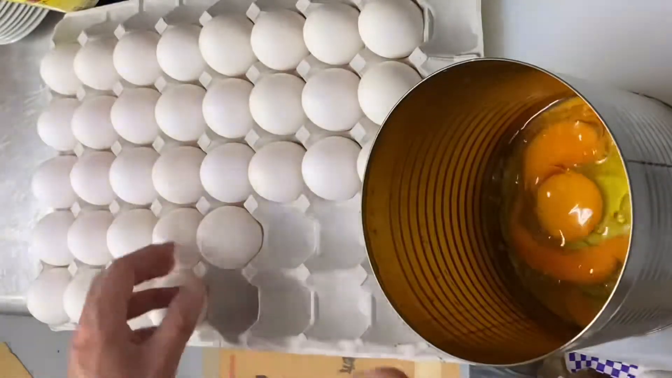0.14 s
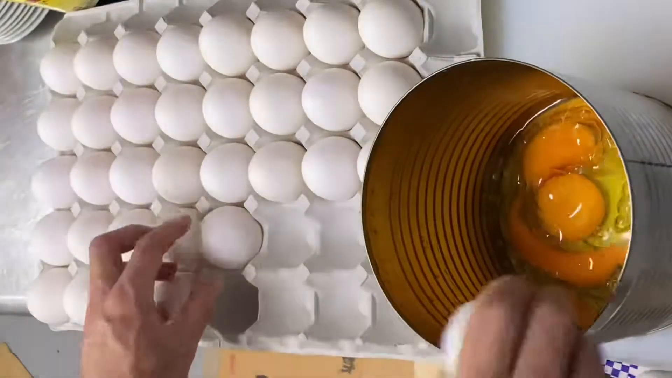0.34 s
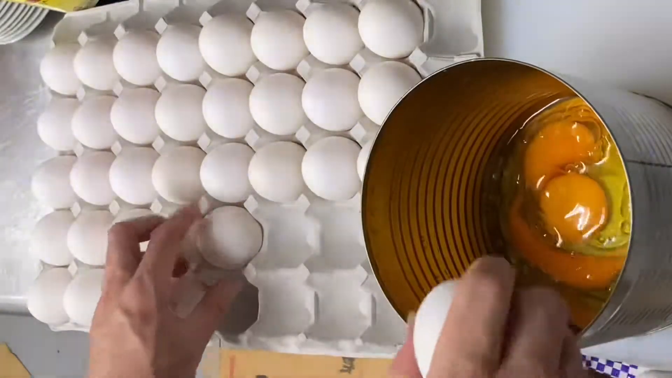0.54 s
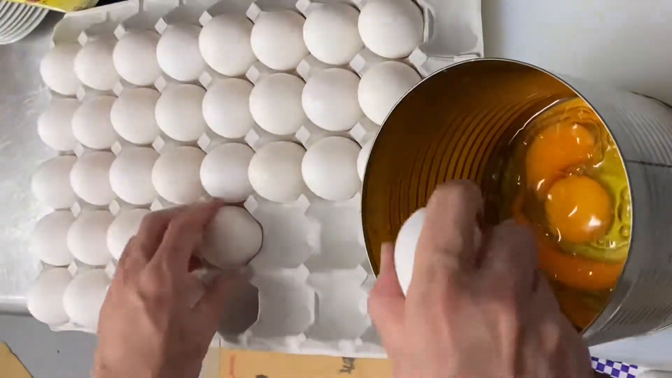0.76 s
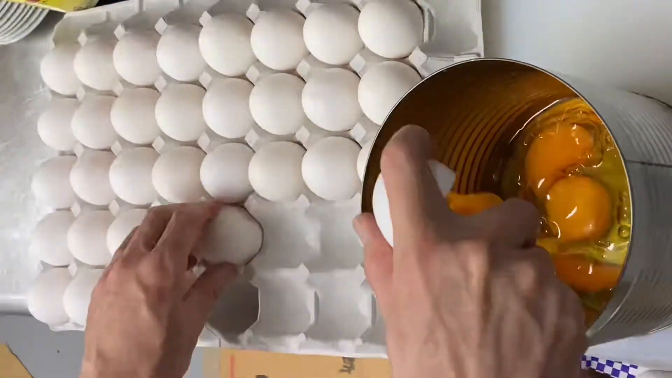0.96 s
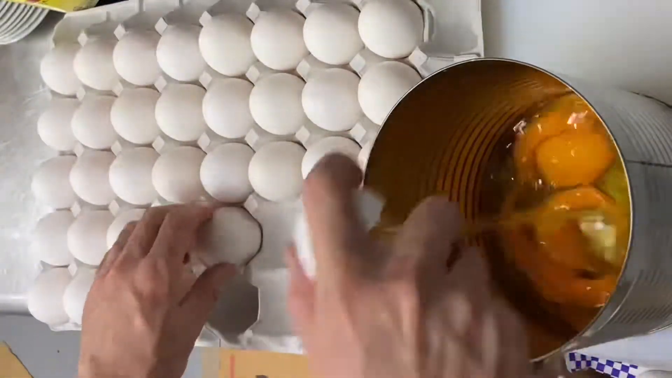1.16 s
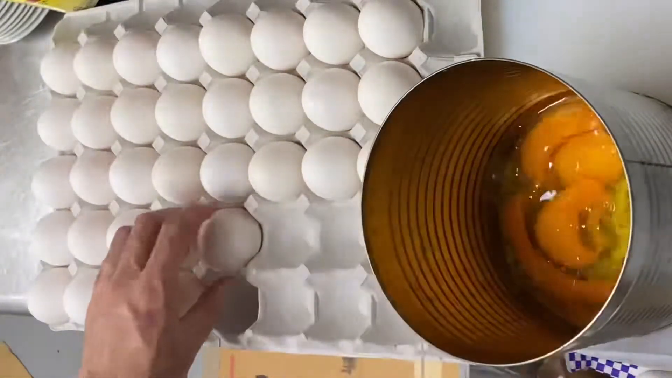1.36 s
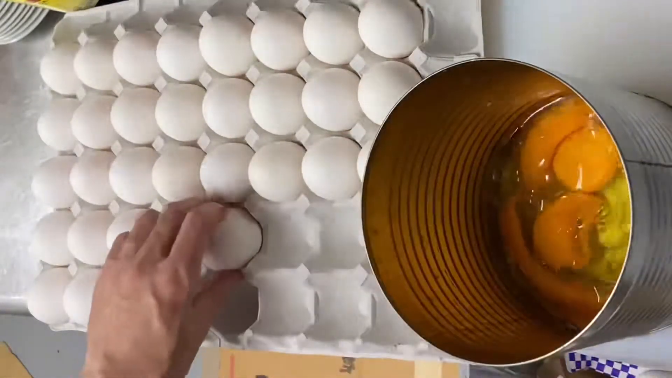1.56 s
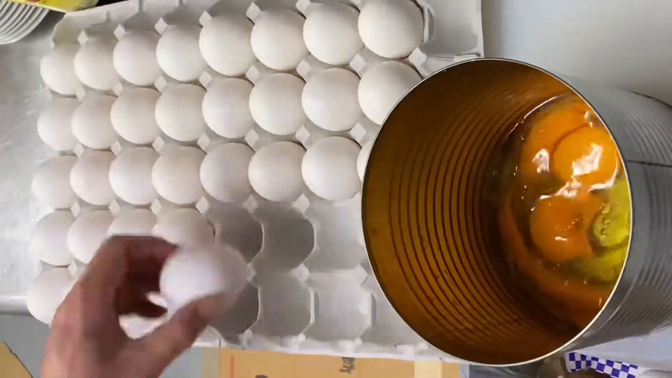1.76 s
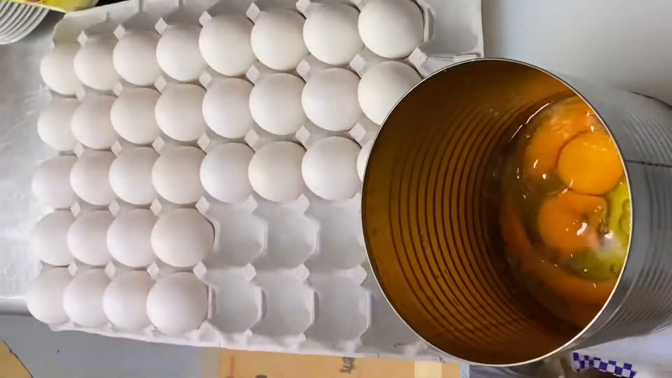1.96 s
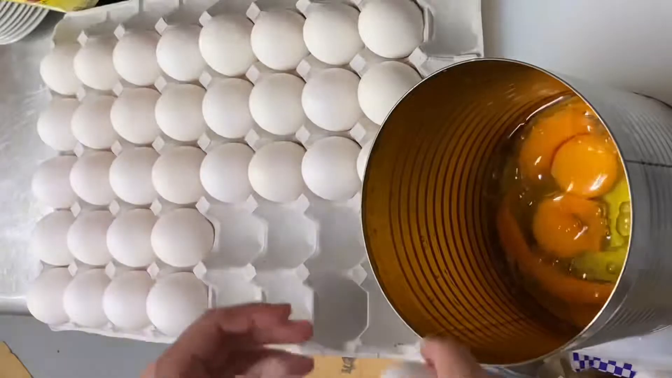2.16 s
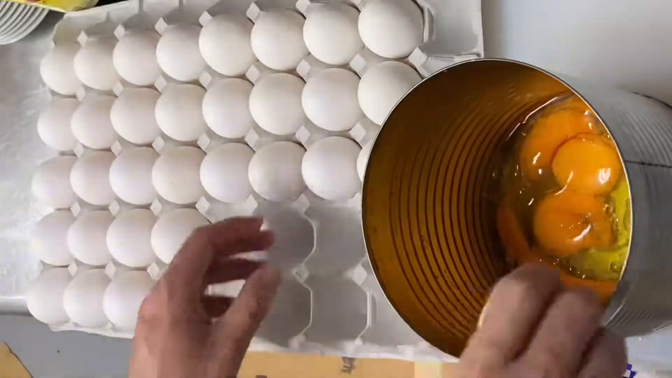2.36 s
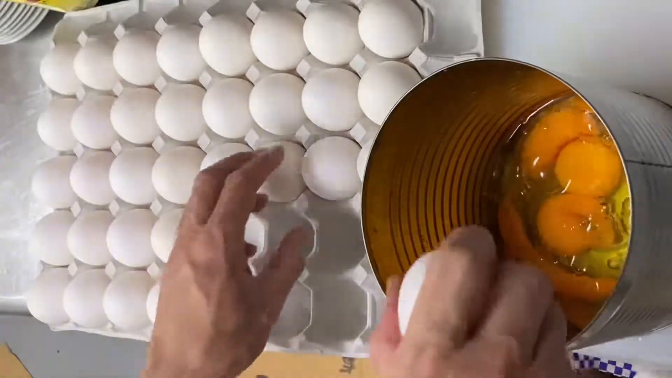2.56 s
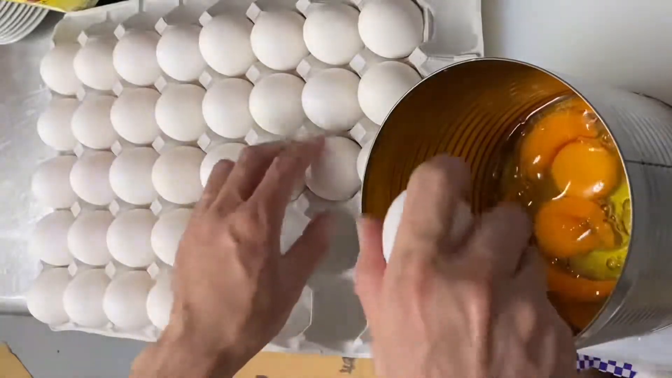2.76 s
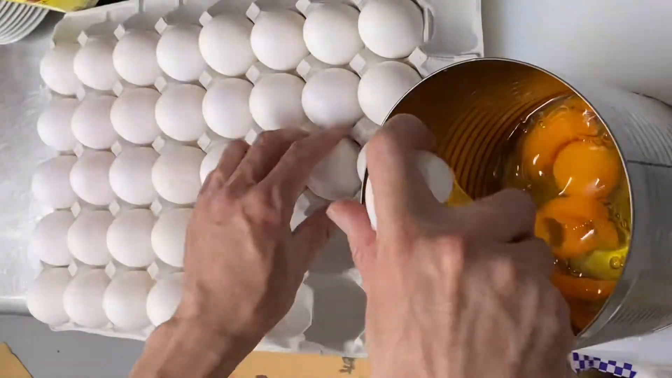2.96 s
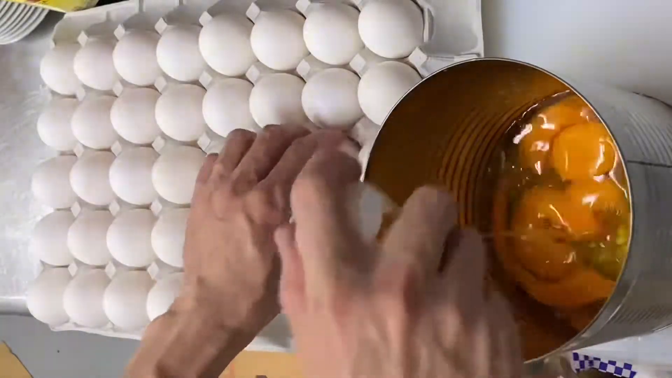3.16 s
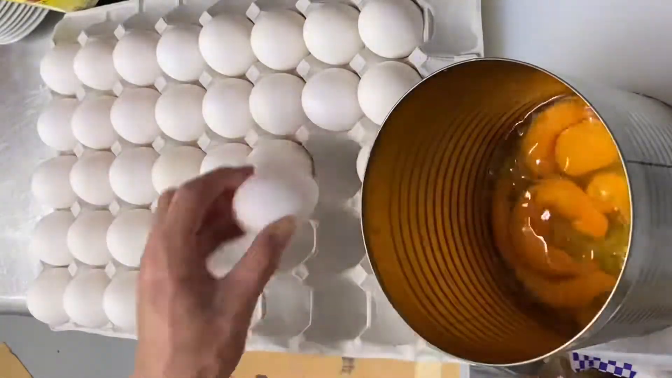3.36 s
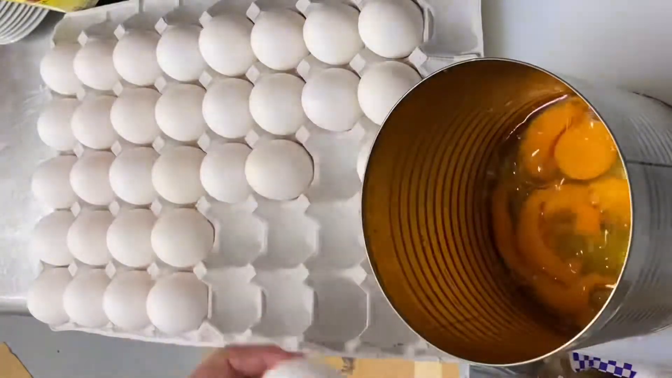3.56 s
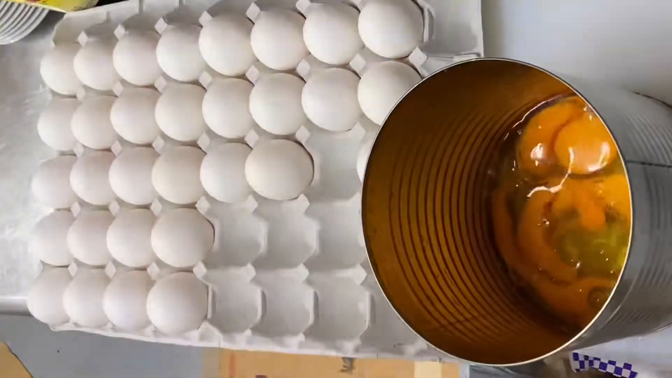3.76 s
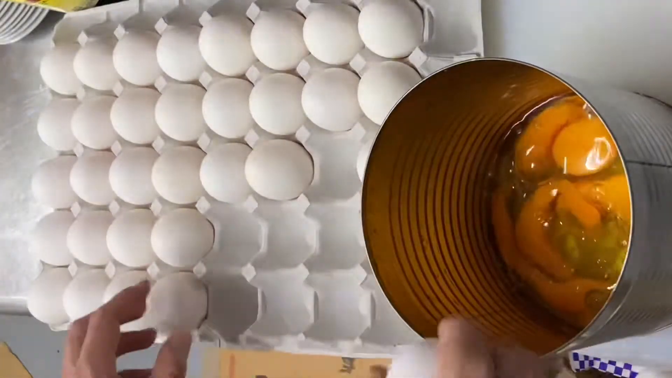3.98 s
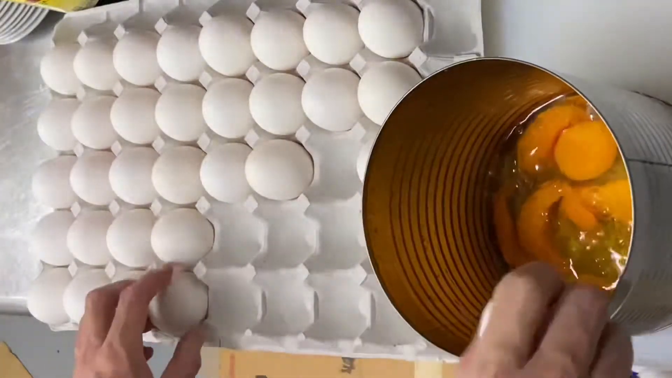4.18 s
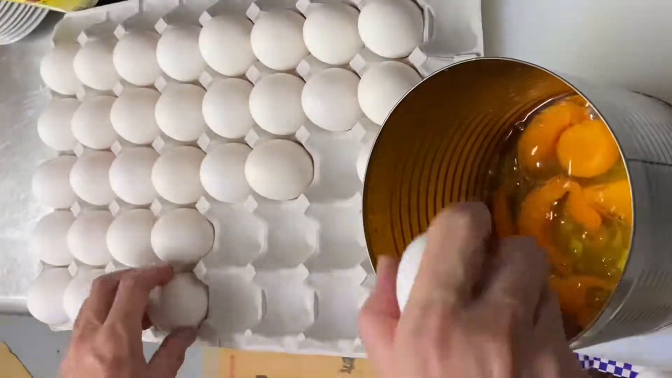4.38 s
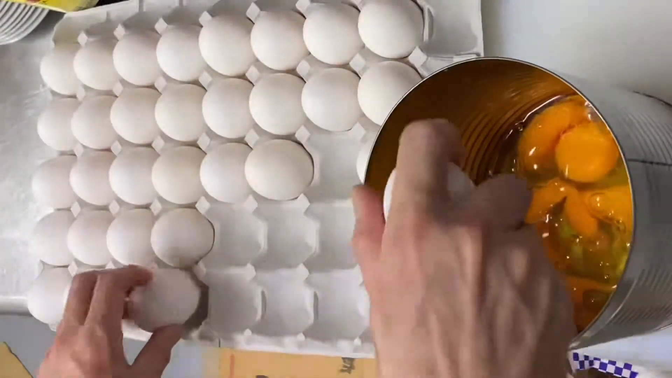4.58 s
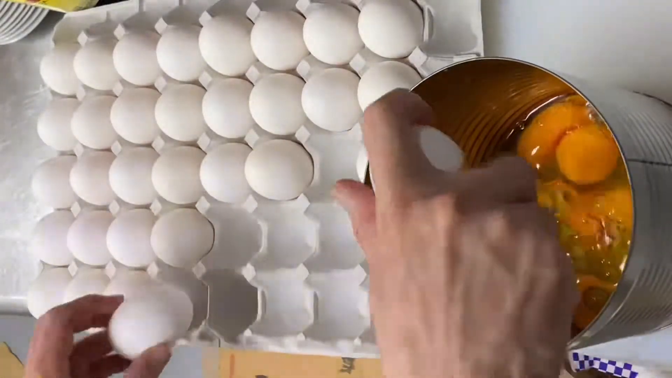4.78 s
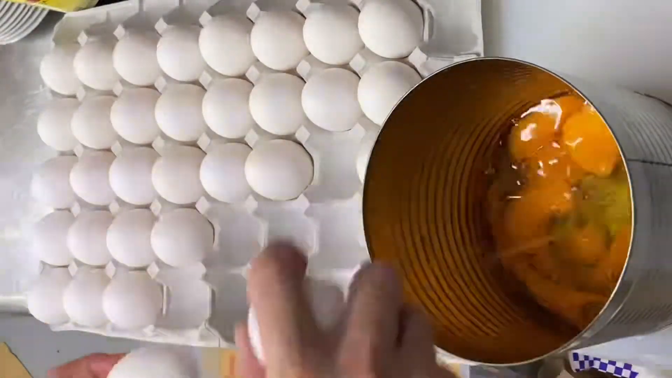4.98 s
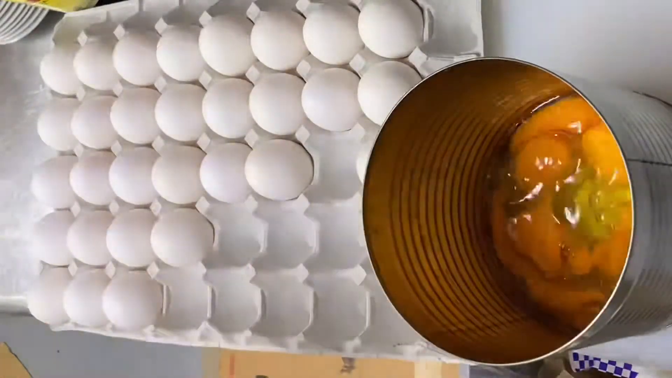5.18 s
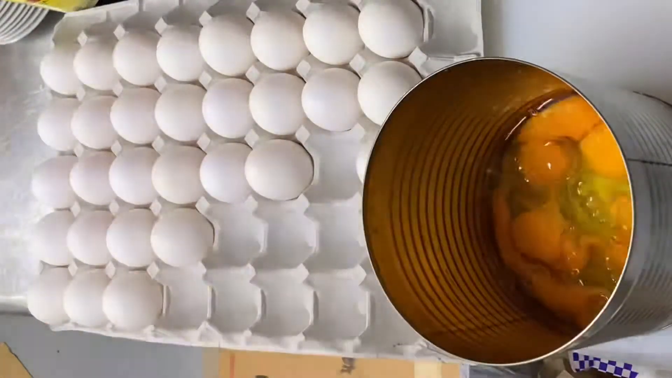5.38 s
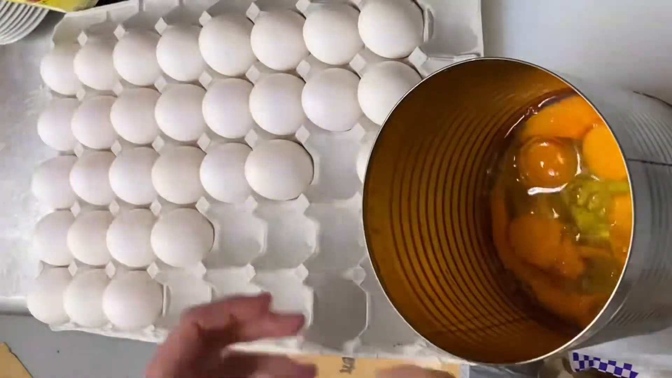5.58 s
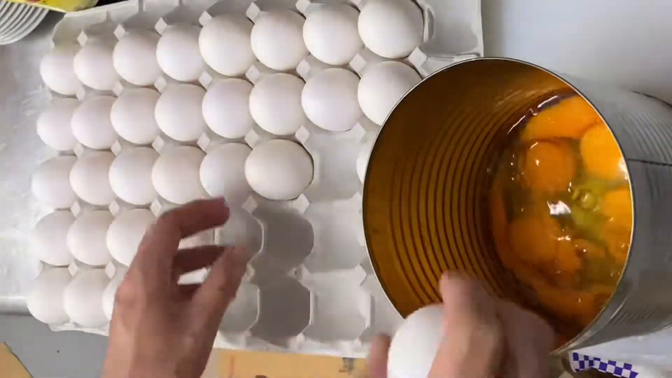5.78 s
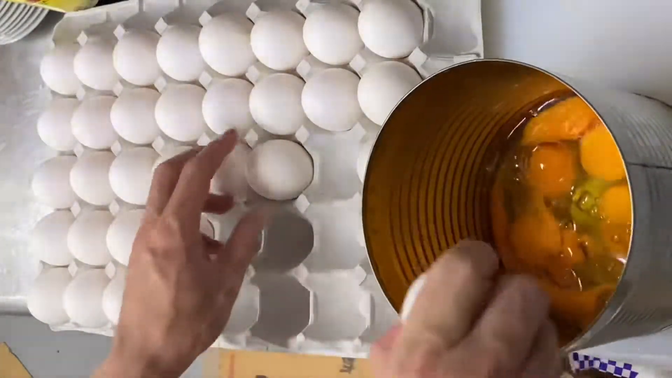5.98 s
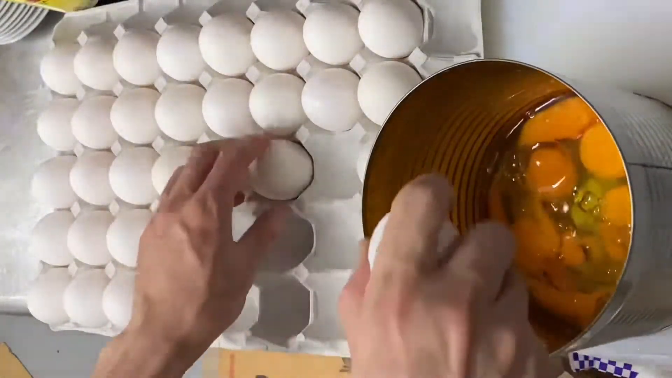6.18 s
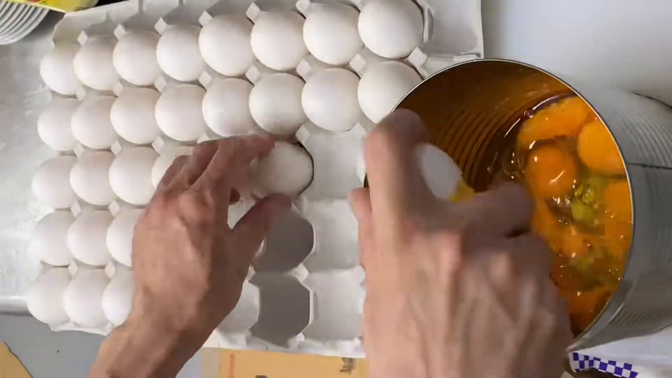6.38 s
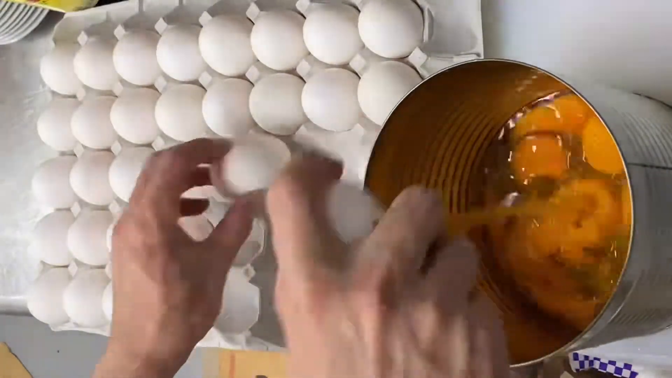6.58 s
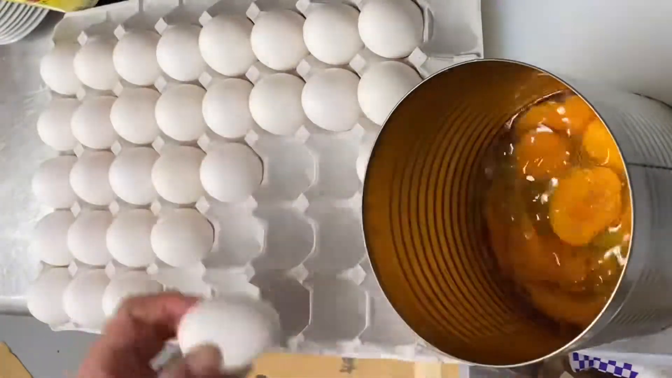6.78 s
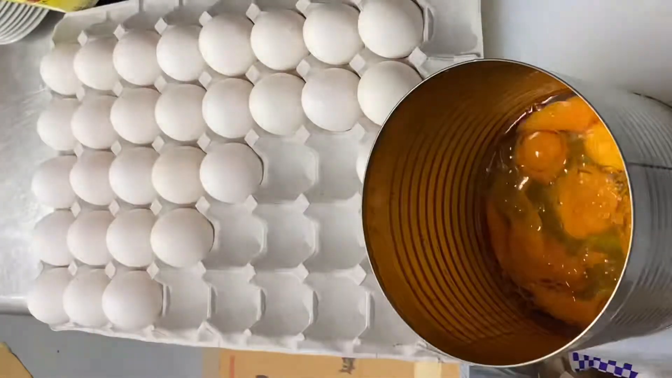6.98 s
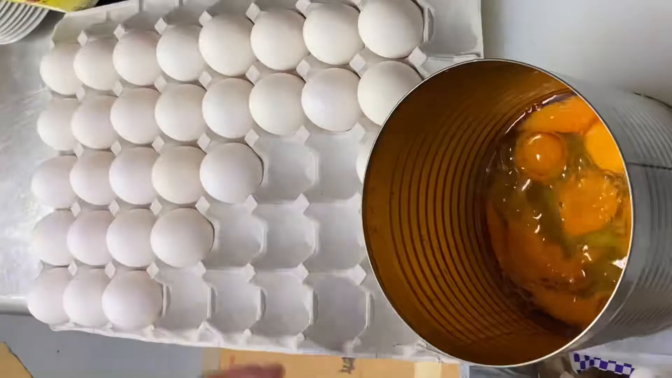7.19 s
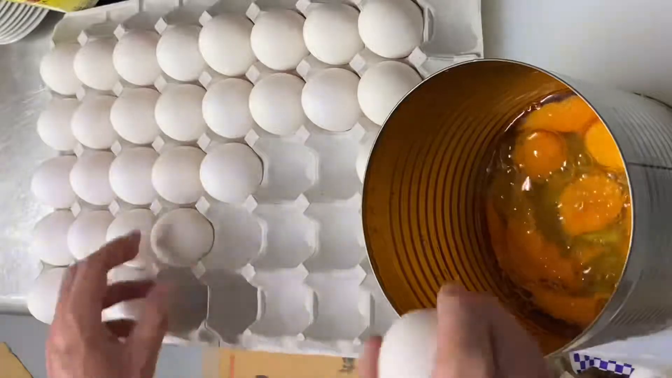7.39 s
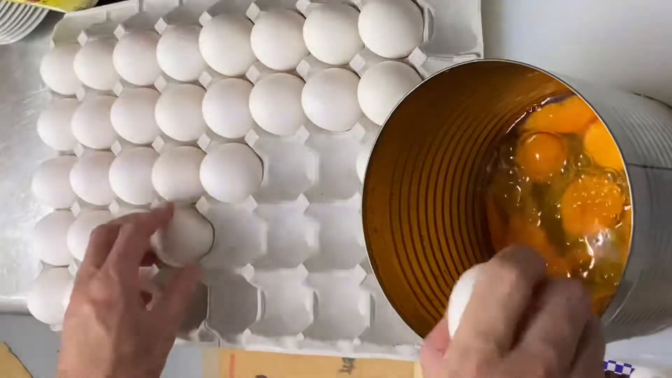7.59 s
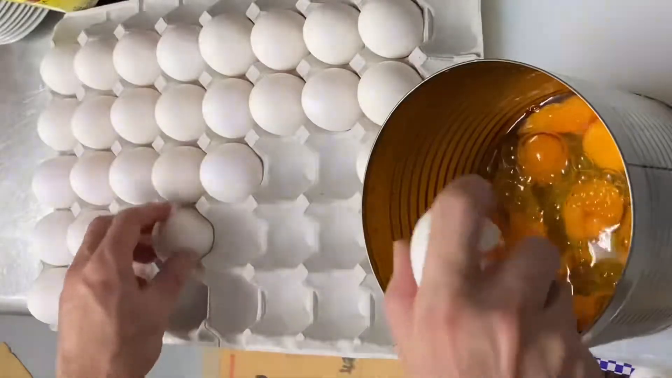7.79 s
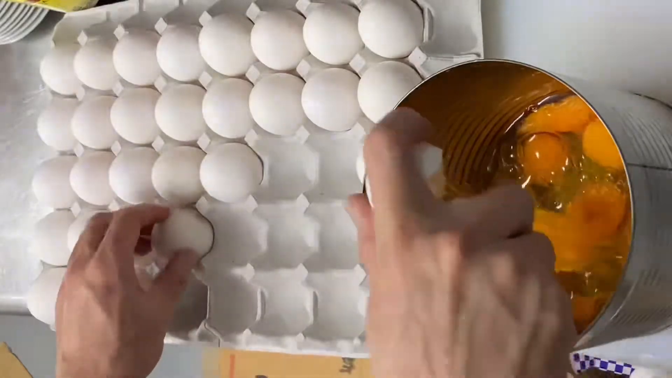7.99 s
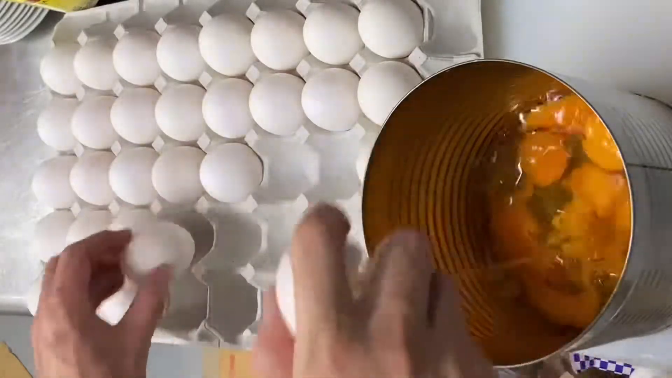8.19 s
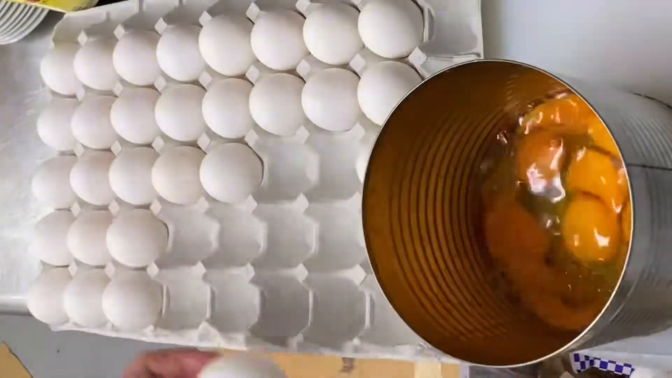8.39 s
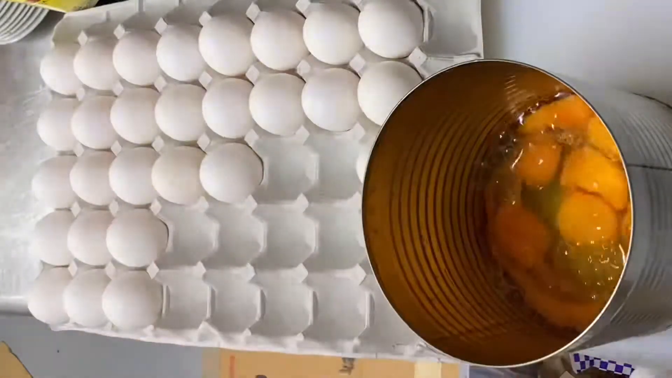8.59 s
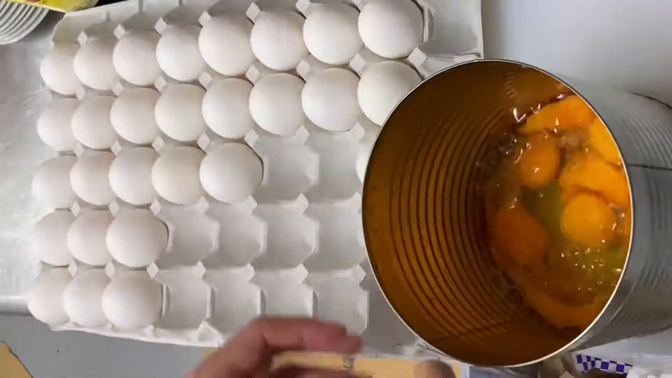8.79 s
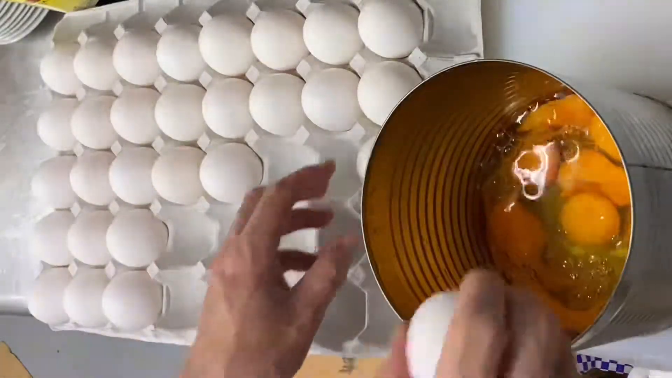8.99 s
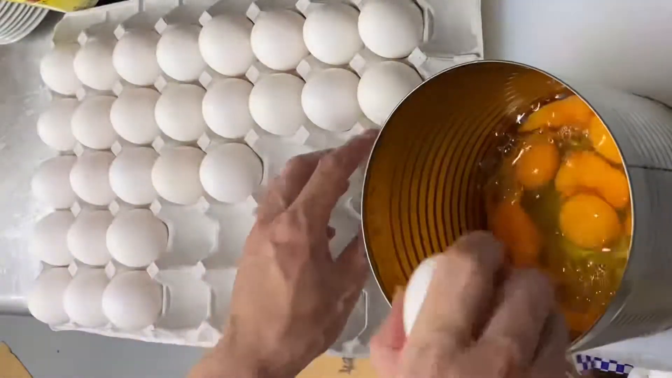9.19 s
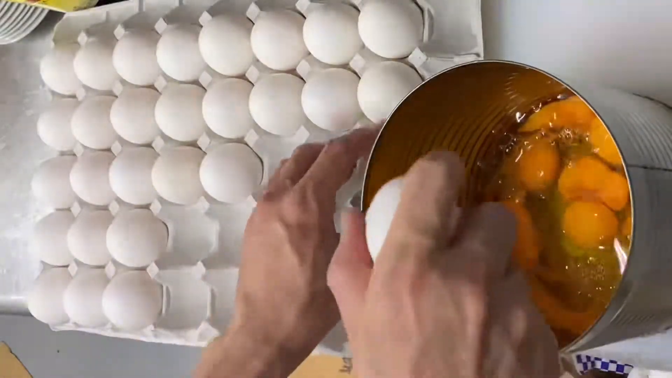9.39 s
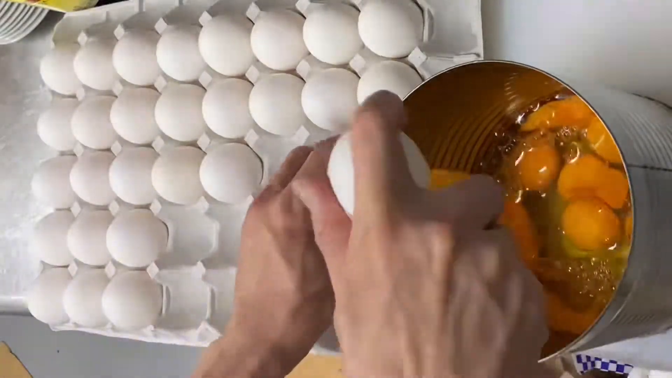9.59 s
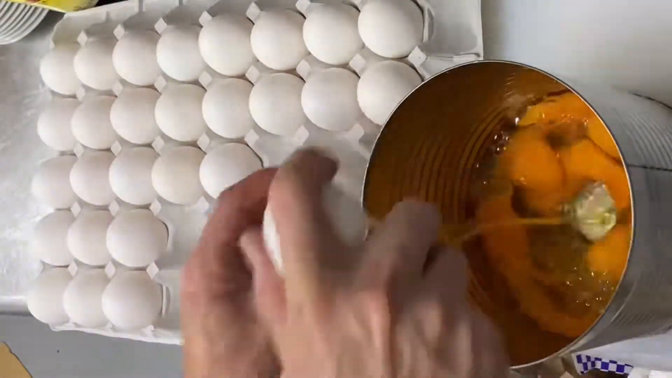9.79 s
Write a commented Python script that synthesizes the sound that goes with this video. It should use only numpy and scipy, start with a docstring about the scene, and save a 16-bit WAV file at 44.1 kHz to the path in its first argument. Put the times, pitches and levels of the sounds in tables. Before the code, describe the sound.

Sharp knocks of eggs on a tin rim, each followed by moist splitting and shells dropping, while fridges and fans rumble.

```python
"""Cracking eggs on a tin

Eggs are knocked on the rim of a big tin, split by hand, and the empty shells tossed away. Each fracture
is a burst of noise that drives the hollow shell's resonance; the struck tin rings in its own modes, and
air pockets pop in the egg white. Dull blows sound from the worktop and the bin, and fans and fridges
rumble underneath. A small hard kitchen reverberates; two close microphone ports listen."""
import sys
import numpy as np
from scipy import signal
from scipy.fft import rfft, irfft, next_fast_len
from scipy.io import wavfile

SR = 44100
rng = np.random.default_rng(int(sys.argv[2]) if len(sys.argv) > 2 else 0)


def master(y):
    """Save y as 16-bit WAV."""
    cut = np.clip(np.atleast_2d(y).T, -1, 1)
    pcm = np.round(cut * 32767)  # scale
    wavfile.write(sys.argv[1], SR, pcm.astype(np.int16))


N = 434385


def amp(db):
    """Amplitude ratio of a level in decibels."""
    return 10 ** (np.asarray(db) / 20)


def unit_rms(x):
    """Normalisation to unit mean power."""
    return x / np.sqrt(np.mean(x ** 2) + 1e-20)


def curve(points, hz, column=1):
    """Interpolation of a table column over logarithmic frequency."""
    points = np.array(points)
    return np.interp(np.log(hz + 1), np.log(points[:, 0] + 1), points[:, column])


def add(mix, s, sound):
    """Superposition: a sound joins the mix at s seconds."""
    part = mix[:, round(s * SR):][:, :sound.shape[1]]
    part += sound[:, :part.shape[1]]


def colour(x, spectrum, tilt_db=0):
    """Spectral shaping, with a further slope of tilt_db per octave above 3 kHz."""
    hz = np.fft.rfftfreq(x.shape[-1], 1 / SR)
    gain_db = curve(spectrum, hz) + tilt_db * np.log2(np.maximum(hz, 3000) / 3000)
    return irfft(rfft(x) * amp(gain_db), x.shape[-1])


# Noise spectra of the machines and of moving air: f/Hz, relative density/dB
RUMBLE_SPECTRUM = [(12, -61), (20, -20), (32, -5), (81, -4.5), (139, -5.5), (167, -18), (195, -8.5),
                   (278, -15), (312, -15.5)]
AIR_SPECTRUM = [(450, -15), (800, -20.5), (1200, -27.5), (1900, -33.5), (2700, -31), (3700, -35.5),
                (5700, -41.5), (9300, -54.5), (10500, -51.5), (16000, -62)]
# Motor tones: f/Hz, width/Hz, level/dB re the broadband noise
MOTOR_TONES = [(48.4, 1.4, -9), (75.4, 5.7, -5.5), (279.1, 11.8, -13.5)]


def machines(floor_db=-37, swell_db=1.13):
    """Broadband and narrowband noise: fans and fridges rumble, hiss and hum, slowly swelling."""
    t, hz = np.arange(N) / SR, np.fft.rfftfreq(N, 1 / SR)
    swell = sum(np.sin(2 * np.pi * (f * t + rng.random())) / np.sqrt(f) for f in np.geomspace(.2, 5, 12))
    white = rfft(rng.standard_normal((2, N)))[:1]
    hums = sum(amp(db) * unit_rms(irfft(white * np.exp(-((hz - f) / width) ** 2), N))
               for f, width, db in MOTOR_TONES)
    wash = unit_rms(colour(rng.standard_normal((2, N)), RUMBLE_SPECTRUM + AIR_SPECTRUM))
    return amp(floor_db + swell_db * unit_rms(swell)) * (wash + hums)


# Reverberation time of the kitchen: f/Hz, T60/s
REVERB_TIMES = [(300, 0.32), (800, 0.2), (2000, 0.2), (5500, 0.18), (12000, 0.068)]
RING_IN_ROOM_DB = -10  # rings and pops carry less into the room than crackle


def kitchen(x, build_s=0.0034):
    """Diffuse reverberation: two independent noise tails, each band decaying at its own rate."""
    hz, t, bands = signal.stft(rng.standard_normal((2, SR // 2)), SR, nperseg=256)
    fall_db = -60 * t / curve(REVERB_TIMES, hz)[:, None]
    rooms_beyond = amp(fall_db / 4.4 - 18)
    tail = signal.istft(bands * (amp(fall_db) + rooms_beyond), SR, nperseg=256)[1]
    tail *= 1 - np.exp(-np.arange(tail.shape[1]) / SR / build_s)
    return signal.oaconvolve(x[None], tail / np.linalg.norm(tail[0]), axes=1)[:, :N]


# Right port against left: f/Hz, extra phase/rad, near correlation, room correlation, left over right/dB
PORT_RESPONSE = [(70, .02, .99, .999, -0.4), (323, -0.16, 1, 0.91, -1), (820, -0.54, 0.21, -0.39, 0.8),
                 (2000, -2.5, 1, 0.24, 2.1), (2850, -0.4, 0.29, 0.55, 0.9), (4320, 0.73, 0.9, 0.19, -1.4),
                 (5320, 1.6, 0.97, 0.3, -1), (7130, -0.45, 0.74, 1, -0.7), (11300, -0.36, 1, 0.91, -0.2),
                 (16000, 0.2, 1, 1, 0.5)]
NEAR_FIELD, ROOM_FIELD = 2, 3  # the correlation columns


def ports(pair, field, turn_hz=5100, left_lag_s=1 / 5430, right_lag_s=1 / 5600):
    """Partial coherence: two signals blend into left and right, apart in phase and level."""
    size = next_fast_len(N + 4096)
    hz = np.fft.rfftfreq(size, 1 / SR)
    left, other = rfft(pair, size)
    alike = np.clip(curve(PORT_RESPONSE, hz, field), -1, 1)
    lean = amp(curve(PORT_RESPONSE, hz, 4) / 2)
    # below turn_hz the left port hears a sound later, above it the right
    cycles = np.minimum(hz, turn_hz) * left_lag_s - np.maximum(hz - turn_hz, 0) * right_lag_s
    phase = curve(PORT_RESPONSE, hz) + 2 * np.pi * cycles
    right = (alike * left + np.sqrt(1 - alike ** 2) * other) * np.exp(1j * phase)
    return irfft(np.array([left * lean, right / lean]), size)[:, :N]


# Spectrum of a dull blow: f/Hz, relative density/dB
THUD_SPECTRUM = [(59, -34), (100, -9), (172, -0.5), (280, 3.5), (586, -3), (749, -3.5), (854, -2),
                 (1970, -31.5), (2320, -32.5), (5000, -52), (6500, -64)]
# Blows on the worktop and in the bin: t/s, level/dB, T60/s, tilt/(dB/octave), boom/dB re the blow
DULL_BLOWS = [(0.7, -21.5, 0.55, 5, -16), (0.727, -16.5, 0.068, -0.5, -24), (1.844, -28, 0.065, 0.5, -3.5),
              (3.711, -31, 0.1, 8, -3), (4.979, -22, 0.47, 4.5, 3.5), (5.009, -30, 0.62, 4.5, -7),
              (5.148, -29, 0.45, -1, 2.5), (5.44, -27.5, 0.12, -6, -7), (7.091, -19, 0.087, -0.5, -16)]


def thuds(boom_hz=275.3, boom_t60=0.26, boom_rise_s=0.011, clack_hz=993, clack_t60=0.069):
    """Damped impacts: low noise blurred by the room, a short clack and the resonant boom of the bin."""
    out, t = np.zeros((2, N)), np.arange(SR // 2) / SR
    for s, db, t60, tilt_db, boom_db in DULL_BLOWS:
        spectrum = [(hz, level + tilt_db * np.log2(hz)) for hz, level in THUD_SPECTRUM]
        decay = amp(-60 * t / t60)
        body = decay * colour(rng.standard_normal((2, len(t))), spectrum)
        body *= np.linalg.norm(decay) / np.linalg.norm(body[0])
        boom = amp(boom_db - 60 * t / boom_t60) * np.sin(2 * np.pi * boom_hz * t)
        boom *= 1 - np.exp(-t / boom_rise_s)
        clack_db = -10.5 + 2 * tilt_db  # brighter blows clack louder
        clack = amp(clack_db - 60 * t / clack_t60) * np.sin(2 * np.pi * clack_hz * t)
        add(out, s - .001, amp(db) * (1 - np.exp(-t / 0.0016)) * (body + clack + boom))
    return out


# Air pockets bursting in the egg white: t/s, level/dB, start f/Hz, end f/Hz, glide time/s
AIR_POCKETS = [(1.094, -36, 1562, 1528, 0.04), (2.755, -41, 2010, 2266, 0.017),
               (3.048, -38, 3750, 3840, 0.026), (3.1168, -25, 2070, 1966, 0.0052),
               (6.319, -41, 1460, 1233, 0.016), (6.488, -30, 1960, 2352, 0.02),
               (6.541, -36, 2120, 2050, 0.01), (8.128, -39.5, 1486, 1456, 0.02),
               (8.162, -35.5, 2615, 2780, 0.018), (9.414, -38, 1930, 2090, 0.0074)]


def bubbles(rise_s=0.0019, roughness=1.6, width_hz=320, spit_db=-25, spit_ratio=1.85):
    """Bubble resonance: a gliding tone, roughened by noise modulation, with a faint spit above it."""
    out, t = np.zeros((2, N)), np.arange(SR // 6) / SR
    pole = np.exp(-np.pi * width_hz / SR)
    for s, db, start_hz, end_hz, length in AIR_POCKETS:
        noise = rng.standard_normal((4, len(t)))
        flutter = signal.lfilter([1], [1, -pole], noise[:2] + 1j * noise[2:])
        flutter *= np.sqrt((1 - pole ** 2) / 2)
        progress = np.minimum(t / length, 1)
        phase = 2 * np.pi * np.cumsum(start_hz + (end_hz - start_hz) * progress) / SR
        tone = (1 + roughness * flutter[0]) * np.exp(1j * phase)
        spit = amp(spit_db) * flutter[1] * np.exp(1j * spit_ratio * phase)
        fall_db = -1.5 * progress - 60 * np.maximum(t / length - 1, 0) / 2.5  # sags, then dies away
        envelope = np.minimum(t / rise_s, 1) * amp(db + fall_db)
        add(out, s, np.tile(envelope * (tone + spit).imag, (2, 1)))
    return out


# Spectrum of breaking shell: f/Hz, relative density/dB
SHELL_SPECTRUM = [(150, -7), (500, -0.5), (1200, -1), (2200, 1.5), (3200, 2), (4200, -6), (5100, -2.5),
                  (5800, -4.5), (6600, -9), (10500, -7.5), (13000, -8.5), (16000, -29)]
# Fingers prying and crumpling wet shell: t/s, duration/s, level/dB
CRUSHES = [(0.74, 1, -60), (1.982, 0.13, -55), (2.717, 0.09, -46), (3.0, 0.34, -53), (6.087, 0.3, -49),
           (6.385, 0.35, -62), (7.18, 0.1, -49.5), (7.647, 0.23, -49.5), (8.02, 0.34, -53.5),
           (9.356, 0.33, -54)]


def rustle(ticks_per_s=300):
    """Shot noise: dense small ticks over a soft scrape, swelling and fading with the hands."""
    t = np.arange(N) / SR
    envelope = sum(amp(db) * np.sin(np.pi * np.clip((t - s) / length, 0, 1)) ** 0.56
                   for s, length, db in CRUSHES)
    strengths = amp(7 * np.minimum(rng.exponential(1, N), 3))
    ticks = signal.lfilter([1], [1, -.96], strengths * (rng.random(N) < ticks_per_s / SR))
    scrape = rng.standard_normal((2, N)) * (1 + 2.2 * unit_rms(ticks))
    return envelope * unit_rms(colour(scrape, SHELL_SPECTRUM, tilt_db=0.92))


def fracture(row, noise, grain, *, bend, grain_db, cycles, glide, dull_db_per_oct,
             rise_s=0.001, strike=0, ring_boost_db=0):
    """Forced resonance: tiny fractures in quick succession drive the hollow shell near its own pitch."""
    db, hz, hollow, t60 = row[1:5]
    # a dry crack (hollowness 0) is bright and hardly rings; a hollow pop (1) is dull and rings
    tilt_db, ring_db = 17 - 27.5 * hollow, -22 + 32 * hollow + ring_boost_db
    t = np.arange(noise.shape[1]) / SR
    first_contact = 1 + strike * np.exp(-t / .004)
    envelope = (1 - np.exp(-t / rise_s)) * amp(-60 * (t / t60) ** bend) * first_contact
    # a chip radiates little below its own pitch: 5 dB less per octave
    spectrum = [(f, level - dull_db_per_oct * np.log2(min(f, 4300)) - 5 * max(np.log2(hz / f), 0))
                for f, level in SHELL_SPECTRUM]
    flicker = amp(grain_db * np.repeat(np.clip(grain, -2, 1.5), 24)[:len(t)])
    crackle = envelope * flicker * colour(noise, spectrum, tilt_db)
    crackle /= np.linalg.norm(crackle[0])
    t = t[:len(t) // 3]
    turns = hz * t * (1 + glide * t)  # a wet cavity shrinks, so its pitch slides up
    ring_cycles = cycles * min(3000 / hz, 1)  # small chips lose their ring sooner
    resonance = amp(-60 * turns / ring_cycles) * np.sin(2 * np.pi * turns)
    ring = signal.oaconvolve(crackle, resonance[None])[:, :len(envelope)]
    ring *= amp(ring_db) / np.linalg.norm(ring[0])
    to_room = crackle[0] + amp(RING_IN_ROOM_DB) * ring[0]
    return amp(db) * np.linalg.norm(envelope) * np.vstack([crackle + ring, to_room])


def fractures(table, **manner):
    """Superposition of one fracture per row: two direct channels and a third that excites the room."""
    out, size = np.zeros((3, N)), SR // 6
    noises = rng.standard_normal((len(table), 2, size))
    grains = rng.standard_normal((len(table), size // 24 + 1))
    for row, noise, grain in zip(table, noises, grains):
        add(out, row[0], fracture(row, noise, grain, **manner))
    return out


# Empty shells landing: t/s, level/dB, ring f/Hz, hollowness (0-1), crackle T60/s
LANDINGS = [(1.8395, -31.5, 1720, 0.54, 0.14), (3.7107, -24.5, 1060, 0.3, 0.096),
            (5.437, -27.5, 1680, 0.46, 0.11), (5.6082, -38.5, 1040, 0.75, 0.11),
            (7.0879, -25.5, 1680, 0.44, 0.14), (8.6775, -26.5, 1310, 0.49, 0.13),
            (8.709, -45, 1000, 1, 0.04), (8.8637, -36.5, 1340, 0.74, 0.11)]


def tossed_shells():
    """Impact with heavy damping: a sharp first contact, then a long crackle that rings little."""
    return fractures(LANDINGS, bend=1.135, grain_db=4.8, cycles=10, glide=.1, dull_db_per_oct=2.6,
                     strike=1.4)


# Shell splitting, crumpling and dripping: t/s, level/dB, ring f/Hz, hollowness (0-1), crackle T60/s
SPLITS = [(0.842, -19.5, 1350, 0.75, 0.013), (0.843, -30, 3230, 0.92, 0.034),
          (0.8663, -26, 3200, 0.56, 0.012), (0.931, -31, 2640, 0.52, 0.019),
          (1.1004, -25.5, 1590, 0.84, 0.02), (1.1513, -45, 5800, 0.7, 0.013),
          (1.1832, -43, 4930, 0.7, 0.023), (1.212, -39.5, 1800, 0.74, 0.031),
          (1.2288, -29.5, 5840, 0.62, 0.022), (1.2749, -32, 960, 0.76, 0.021),
          (1.3054, -37.5, 980, 0.75, 0.023), (1.3802, -30.5, 1120, 0.65, 0.016),
          (2.71, -37.5, 4700, 0.54, 0.027), (2.7556, -33.5, 2100, 0.2, 0.0098),
          (2.8017, -27.5, 1270, 0.66, 0.013), (2.8124, -29, 4560, 0.55, 0.017),
          (3.0276, -26.5, 6000, 0.61, 0.017), (3.051, -26.5, 3640, 0.69, 0.019),
          (3.1105, -29, 9600, 0.6, 0.012), (3.1135, -26, 3020, 0.89, 0.021), (3.14, -37, 1340, 0.87, 0.048),
          (3.1795, -35, 5200, 0.9, 0.018), (3.1842, -24.5, 3220, 0.67, 0.034),
          (4.59, -33.5, 2450, 0.72, 0.082), (4.8927, -16, 5200, 0.25, 0.014),
          (5.0005, -20.5, 2630, 0.82, 0.014), (5.0848, -19.5, 1110, 0.76, 0.013),
          (6.121, -40, 5900, 0.42, 0.027), (6.1906, -26, 1900, 0.48, 0.024),
          (6.2765, -26.5, 1720, 0.3, 0.014), (6.3175, -20.5, 1270, 0.7, 0.01),
          (6.4108, -32.5, 1100, 0.28, 0.033), (6.4657, -39, 2840, 0.68, 0.033),
          (6.4837, -22.5, 2200, 0.75, 0.025), (6.5425, -35, 2050, 0.2, .015),
          (6.5594, -26.5, 2290, 0.64, 0.03), (6.5994, -36, 890, 0.7, 0.04),
          (7.6867, -32.5, 2420, 0.4, 0.012), (7.7697, -37, 2970, 0.64, 0.038),
          (7.7877, -28, 2870, 0.42, 0.033), (7.884, -27, 1375, 0.52, 0.011),
          (7.945, -25, 1850, 0.73, 0.011), (8.131, -27.5, 1490, 0.42, 0.015),
          (8.158, -38, 2650, 0.85, 0.028), (8.2467, -37, 2690, 0.37, 0.043),
          (9.388, -42, 4500, 0.56, 0.054), (9.406, -36.5, 1970, 0.58, 0.17),
          (9.4434, -32, 1100, 0.53, 0.069), (9.5955, -34, 1110, 0.84, 0.016),
          (9.7549, -16, 6860, 0.59, 0.015)]


def splitting_shells():
    """Brittle fracture: grainy snaps excite wet cavities whose resonance glides upward."""
    return fractures(SPLITS, bend=1.3, grain_db=6, cycles=30, glide=2.8, dull_db_per_oct=-1)


# Modes of the tin: f/Hz, level/dB, T60/s
TIN_MODES = [(470, 15, .12), (1227, -6, .25), (1335, 6, .17), (2200, 3, .2), (2540, -4, .2), (2283, 4, .14),
             (3510, -2, .25), (2335, -3, .6)]
# Fingers brushing the tin: t/s, level/dB, f/Hz
FINGER_TAPS = [(0.842, -33, 1335)]


def tin(knocks, fall_db_per_oct=130, max_fall_db=22):
    """Modal vibration: knocks and finger taps ring the tin, favouring modes near the blow's pitch."""
    out, t = np.zeros((2, N)), np.arange(SR // 2) / SR
    blows = [(s, db + tin_db, hz) for s, db, hz, *_, tin_db, _ in knocks] + FINGER_TAPS
    for s, db, blow_hz in blows:
        modes = np.zeros(len(t))
        for hz, mode_db, t60 in TIN_MODES:
            loss_db = min(fall_db_per_oct * abs(np.log2(hz / blow_hz)), max_fall_db)
            modes += amp(mode_db - loss_db - 60 * t / t60) * np.sin(2 * np.pi * (hz * t + rng.random()))
        add(out, s, np.tile(amp(db) * (1 - np.exp(-t / 0.0016)) * modes, (2, 1)))
    return out


# Bright clack of the rim: f/Hz, level/dB re the blow
RIM_MODES = [(5080, -19.5), (5790, -14.5)]
# Eggs striking the rim: t/s, level/dB, ring f/Hz, hollowness (0-1), crackle T60/s,
# tin level/dB re the blow, lead-in level/dB re the blow
EGG_KNOCKS = [(0.3932, -15, 1370, 0.51, 0.029, -3.5, -32), (2.388, -13.5, 1740, 0.51, 0.029, -5.5, -16),
              (4.151, -12.5, 2030, 0.43, 0.027, -19, -23), (5.8829, -14.5, 1300, 0.41, 0.035, -6, -13),
              (7.5157, -13, 2630, 0.44, 0.034, -6, -27), (9.0726, -14, 2304, 0.46, 0.03, -14.5, -24)]


def egg_knocks(lead_in_s=0.0093, lead_in_hz=3140, lead_in_t60=0.11, rim_t60=0.016):
    """Impact fracture: the shell breaks on the rim, and the rim answers with a short clack."""
    # a faint, bright noise swells just before each knock
    lead_ins = [(s - lead_in_s, db + lead_in_db, lead_in_hz, hollow, lead_in_t60)
                for s, db, _, hollow, *_, lead_in_db in EGG_KNOCKS]
    rims = [(s, db + rim_db, hz, 1, rim_t60) for s, db, *_ in EGG_KNOCKS for hz, rim_db in RIM_MODES]
    blow = dict(rise_s=0.0009, bend=2.07, grain_db=4.5, cycles=22, glide=0.12, dull_db_per_oct=3,
                ring_boost_db=6)
    out = fractures(EGG_KNOCKS + lead_ins, **blow)
    out[:2] += fractures(rims, **blow)[:2]  # the clack is heard close by only
    return out


def scene(reverb_db=-2.5):
    """Direct and diffuse fields add at the two ports, each with its own coherence."""
    shells = egg_knocks() + tossed_shells() + splitting_shells()
    ringing = tin(EGG_KNOCKS) + bubbles()
    scrape = rustle()
    direct = shells[:2] + ringing + scrape
    to_room = shells[2] + scrape[0] + amp(RING_IN_ROOM_DB) * ringing[0]
    diffuse = amp(reverb_db) * kitchen(to_room) + thuds() + machines()
    return ports(direct, NEAR_FIELD) + ports(diffuse, ROOM_FIELD)


def record(dry, low_hz=40, high_hz=16900):
    """Saturation and band limits: the microphone drops deep bass, the input stage rounds off peaks."""
    thinned = signal.sosfilt(signal.butter(4, low_hz, "high", fs=SR, output="sos"), dry)
    lowpass = signal.firwin(511, high_hz, window=("kaiser", 9), fs=SR)
    return signal.oaconvolve(np.tanh(thinned), lowpass[None], "same")


dry = scene()
out = record(dry)
master(out)
```